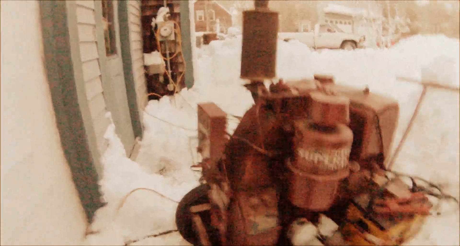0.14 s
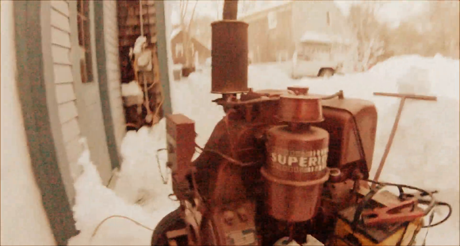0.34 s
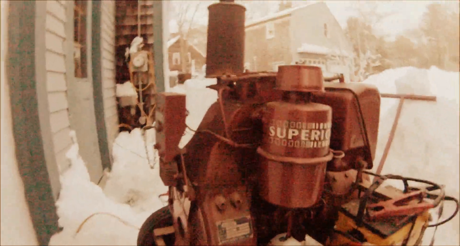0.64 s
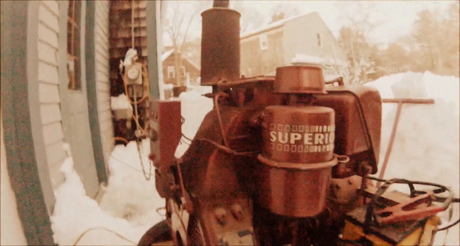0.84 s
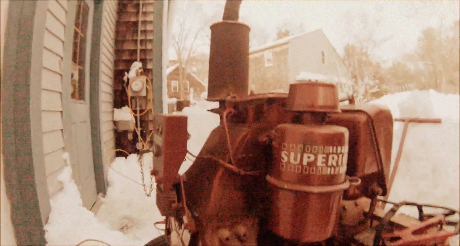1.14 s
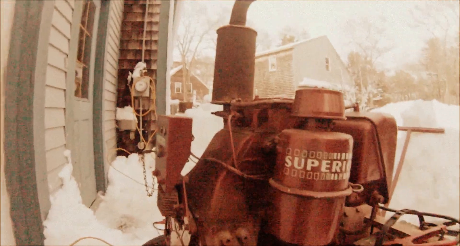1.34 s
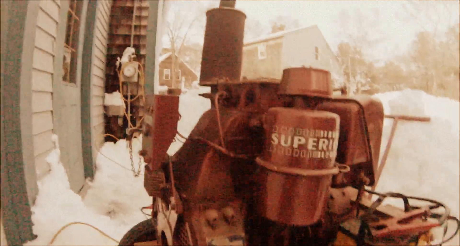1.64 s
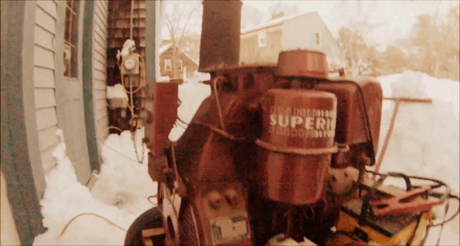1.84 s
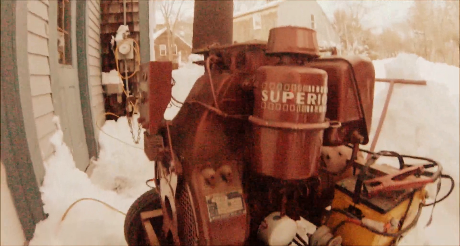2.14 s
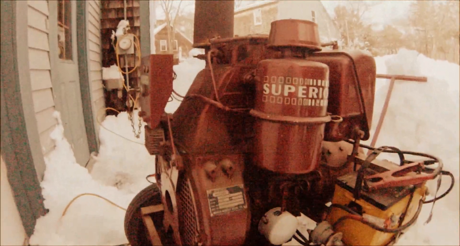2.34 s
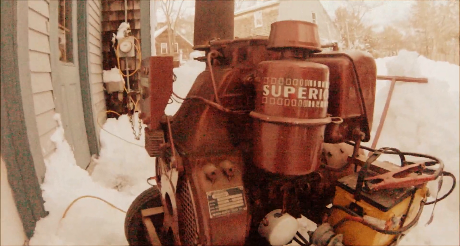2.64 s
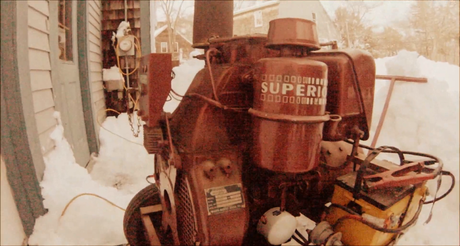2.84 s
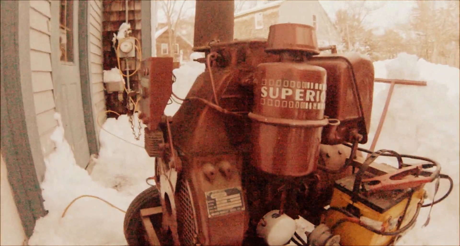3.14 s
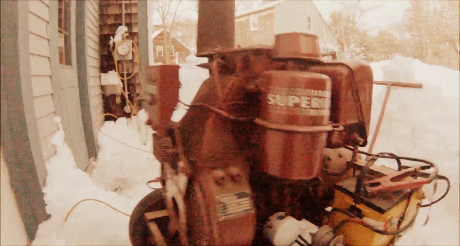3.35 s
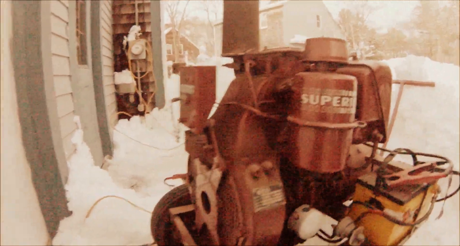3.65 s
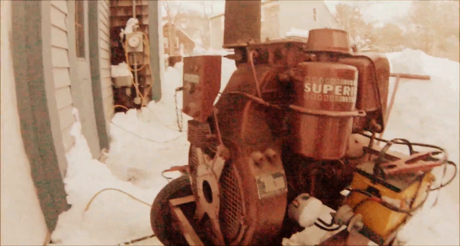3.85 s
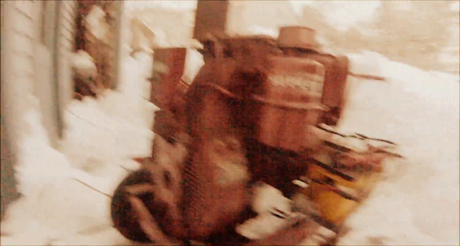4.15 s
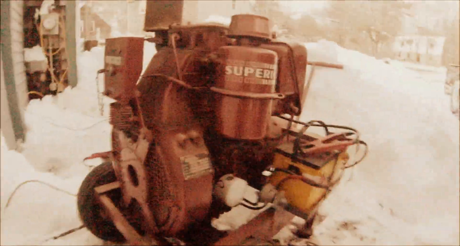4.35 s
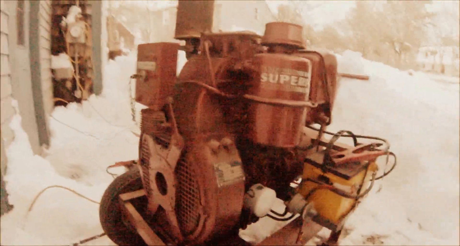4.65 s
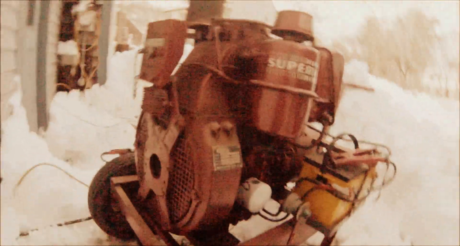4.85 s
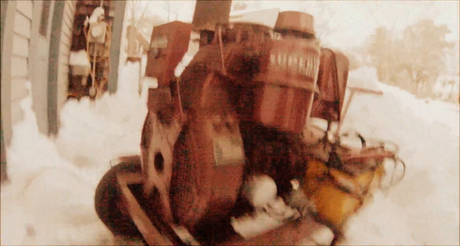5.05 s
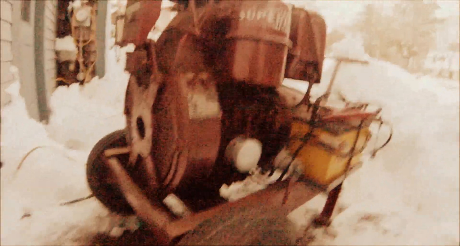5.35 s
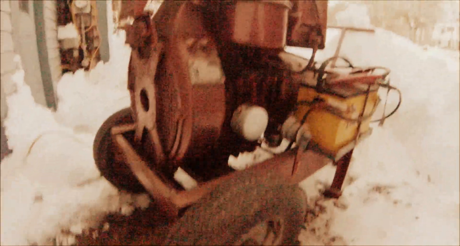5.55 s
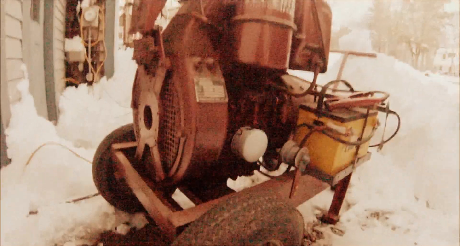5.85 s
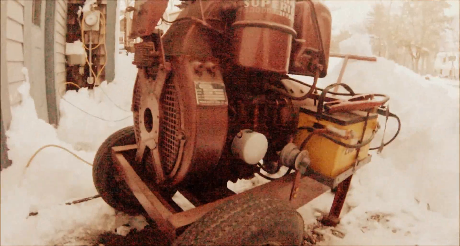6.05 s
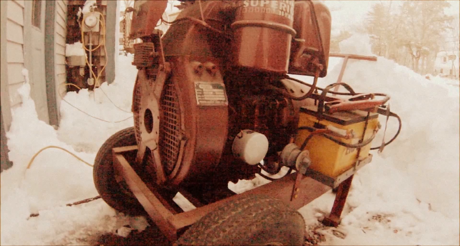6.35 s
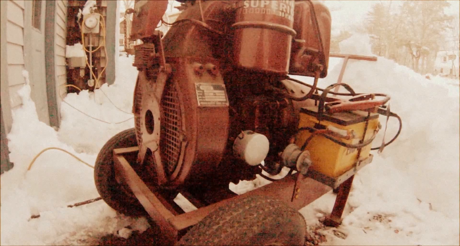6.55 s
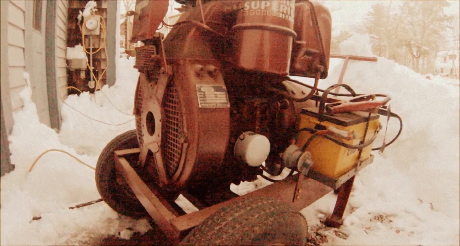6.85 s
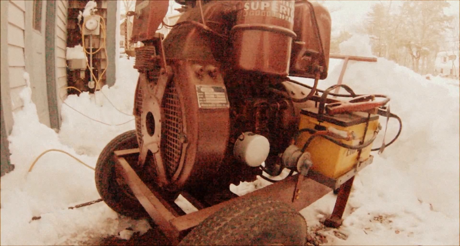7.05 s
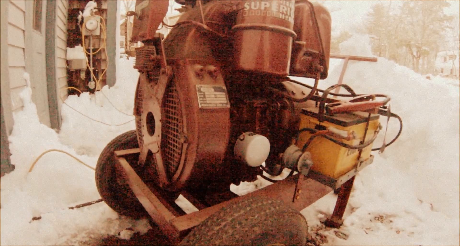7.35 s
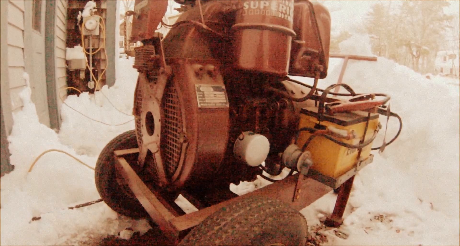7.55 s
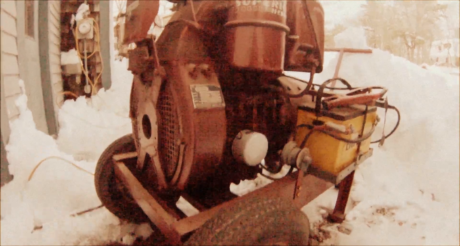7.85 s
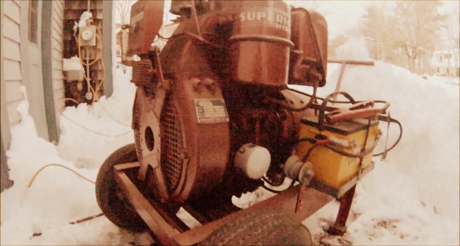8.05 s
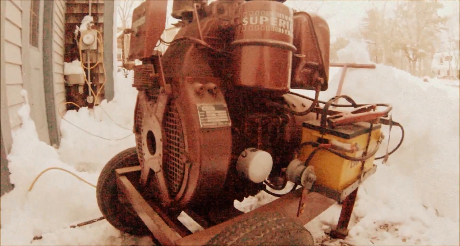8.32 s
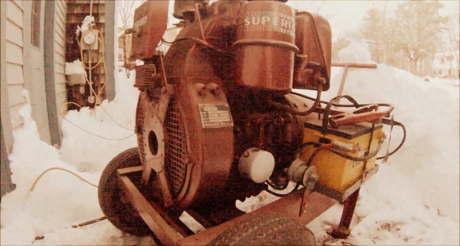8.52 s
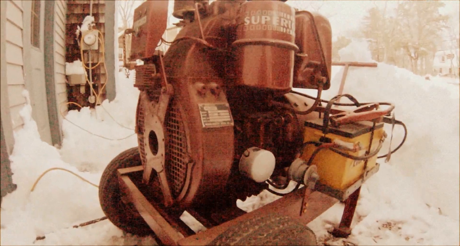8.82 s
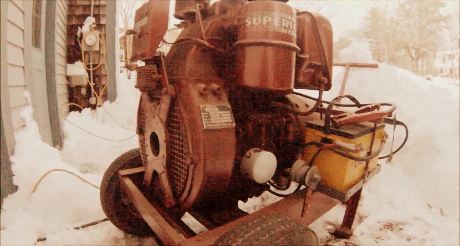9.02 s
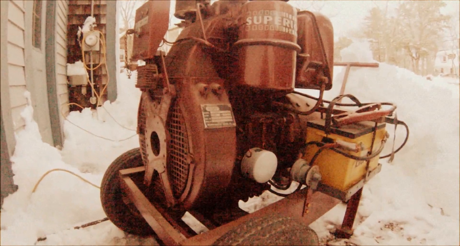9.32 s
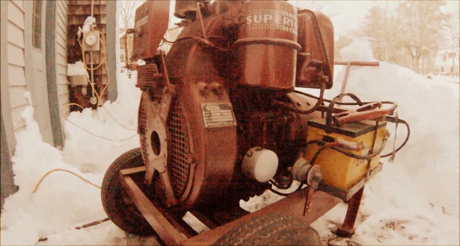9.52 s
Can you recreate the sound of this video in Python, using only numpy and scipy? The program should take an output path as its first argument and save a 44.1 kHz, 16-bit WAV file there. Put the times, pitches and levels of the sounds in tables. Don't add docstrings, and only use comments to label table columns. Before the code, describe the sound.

A diesel engine already running hammers evenly from start to finish, about fifteen beats a second, dry and close in open air. Bright clatter and breathy treble puffs ride over a low throb and steady mechanical whine. As the listener steps around, the tone shifts slightly duller and less whiny, while fingers rub, scratch and bump the plastic microphone case, ending in a loud snap; then the steady engine remains undisturbed.

```python
import sys
import numpy as np
from scipy import signal
from scipy.fft import rfft, irfft
from scipy.io import wavfile
from scipy.ndimage import uniform_filter1d

SR = 44100
rng = np.random.default_rng(int(sys.argv[2]) if len(sys.argv) > 2 else 0)


def elevation(decibels):
    levels = np.asarray(decibels, float)
    return 10 ** (levels / 20)


def persist_wave(psi):
    counts = np.round(np.clip(psi, -1, 1) * 32767).astype(np.int16)
    wavfile.write(sys.argv[1], SR, np.atleast_2d(counts).T)


N = 426888

CYCLE_HZ = 15.292
FIRING_AT = (.528, .542)
FRAME_ORDERS, FRAME_LAG = (4, 10), .08
REST_TREBLE_DB, REST_MIDDLE_DB = -3.5, -2
GUST_DB, GUST_HZ, SHELTER_DB = 4.0, 1.6, -2.5
INJECTOR_BEAM_DB, COVER_BEAM_DB = -2, 4.0
SNAP_S, SNAP_DB, SWING_DB, SWING_HZ = 5.6853, -9, -9.5, 26
PUSH_DB = -10
STROKE_RISE_S, STROKE_FALL_S, SHIFT_S = 0.036, 0.048, 0.077

# (time [s], place [0 first - 1 second], hand turn [-1 injector side - +1 valve cover])
WALK = [(0, 0.24, -0.2), (.4, 0.031, -0.5), (.9, 0, -.4), (1.4, 0.059, -1.1), (1.9, 0, -0.51),
        (2.4, 0.085, 0.44), (3.4, 0.025, 0.0033), (4.3, 0.56, .2), (4.7, 0.34, 0), (5.1, .67, .1),
        (5.4, 0.96, 0), (6, 1, 0.15), (8.5, 0.92, 0), (9.68, 0.85, 0)]
# (multiple of cycle, first place [dB rms], second place [dB rms])
EXHAUST_ORDERS = [(1, -49, -57), (2, -44, -45), (3, -46, -47), (4, -47, -49), (5, -41, -40), (6, -40, -37),
                  (7, -56, -63), (8, -62, -65), (9, -53, -54), (10, -51, -51), (11, -53, -58),
                  (12, -50, -53), (13, -56, -59), (14, -63, -63), (15, -63, -65), (16, -69, -64)]
# (multiple of cycle, first place [dB rms], second place [dB rms])
TONE_ORDERS = [(30, -57, -54), (32, -54, -58), (33, -56, -56), (34, -51, -58), (36, -53, -49),
               (38, -60, -55), (42, -58, -65), (46, -58, -57), (48, -70, -58), (68, -55, -56),
               (70, -49, -55), (72, -47, -49), (74, -54, -62), (94, -48, -48), (95, -50, -60),
               (100, -44, -53), (101, -49, -70), (102, -50, -50), (103, -60, -52), (104, -49, -57),
               (105, -48, -70), (106, -42, -46), (108, -54, -48), (109, -63, -55), (110, -55, -58),
               (114, -55, -64), (140, -54, -65), (142, -49, -47), (144, -44, -47), (146, -52, -50)]
TONE_FAMILIES = [(50, 0.0035, 0.67), (80, .42, 0.23), (120, .08, 0.5), (150, 0.0025, 0.23)]
# (centre [Hz], width [Hz], first place [dB], second place [dB])
CASING_MODES = [(369, 57, -56, -62), (465, 125, -52, -51), (707, 110, -51.5, -54), (1004, 72, -50.5, -51.5),
                (1118, 125, -47.5, -52), (1412, 148, -41, -45), (1540, 161, -36.5, -42),
                (1735, 260, -51, -47.5), (2200, 240, -45, -45), (2448, 234, -41, -43.5),
                (2706, 150, -55.5, -53), (3090, 200, -54, -48.5), (3426, 330, -45.5, -46),
                (3883, 440, -47, -52), (4850, 520, -52, -56.5), (6655, 670, -51.5, -50.5),
                (8100, 500, -91.5, -79), (10300, 890, -62.5, -66.5), (11330, 1200, -62.5, -61.5),
                (14400, 870, -70, -73)]
# (top [share of cycle], rise [share], fall [share], treble [dB], middle clatter [dB])
PUFFS = [(.005, .01, .06, 5, -0.5), (.3, 0.11, 0.097, -1, 2), (.55, .11, .14, 5, 4),
         (.757, .02, 0.18, 8.0, 3.0), (0.937, 0.0096, .05, 0, 5.5)]
# (frequency [Hz], density [dB per Hz])
AIR_SPECTRUM = [(12, -53.5), (30, -64), (80, -74), (200, -78.5), (800, -78), (2000, -80.5), (4300, -82),
                (5600, -84), (7500, -88.5), (9000, -91.5), (12500, -101), (15700, -103)]
# (time [share of cycle], first place peak [dB], second place peak [dB], favoured [Hz])
CONTACTS = [(.25, -38, -54, 6600), (.46, -53.5, -56, 14000), (.733, -41.5, -48, 11000),
            (.748, -40, -39, 14400), (.75, -55, -35, 6970), (.775, -42, -43, 10600), (.8, -54, -39.5, 6800),
            (.928, -44, -45, 14400), (.932, -39.5, -43, 9800), (.955, -45, -40.5, 10000)]
# (frequency [Hz], t60 [s], first place [dB], second place [dB])
VALVE_GEAR_PARTS = [(4850, 0.0067, -5, -7), (6600, 0.021, -7, -1), (6850, 0.013, -3, 3),
                    (8280, 0.023, -27, -10), (9480, 0.0091, -2.5, -4), (10200, .012, -1, -5.5),
                    (11250, 0.0078, 0.5, -3.5), (12600, 0.0072, -9, -6), (14400, 0.0062, -5, -3),
                    (14750, 0.0046, -9, -4)]
# (time [s], peak [dB], thump [Hz], crack re thump [dB])
KNOCKS = [(0.984, -27, 105, -16), (1.858, -27, 102, -14), (4.051, -23, 143, -19), (4.073, -17, 150, -4.5),
          (4.249, -26, 153, -2), (4.334, -35, 103, -5), (4.37, -22.5, 128, -14), (4.397, -26, 137, -10),
          (4.459, -22.5, 105, -10), (4.573, -16.5, 124, -15), (4.623, -30, 102, -18), (4.668, -26, 106, -6),
          (4.696, -24.5, 124, -2), (4.805, -23, 128, -15), (4.867, -21, 161, -22), (4.877, -17, 270, -33),
          (4.933, -24, 144, -18), (4.959, -29, 103, -15), (5.015, -18.5, 121, -15), (5.122, -28, 127, -16),
          (5.217, -22, 120, -9), (5.288, -31, 213, -9), (5.481, -33, 137, -15), (5.798, -16, 149, -21),
          (5.859, -22, 188, -25), (5.935, -24, 103, -20)]
# (frequency [Hz], level [dB], t60 [s])
CASE_MODES = [(696, -2, 0.021), (994, -12, 0.033), (1443, 3.5, 0.016), (2330, -38, 0.21)]
# (start [s], length [s], pressure [dB], slide [dB], slide speed [0 scratch - 1 rustle])
STROKES = [(0.142, 0.069, -31, -48, .15), (0.194, 0.15, -32, -46, .1), (4.06, .14, -46, -48, .6),
           (4.26, .12, -38, -48, .3), (4.42, 0.071, -33.5, -39, 0.46), (4.538, .06, -33.5, -36, 0.78),
           (4.65, .06, -37, -34, .7), (4.837, 0.075, -31, -39, .6), (4.927, .06, -35, -38, .75),
           (5.03, .15, -35.5, -38.5, 0.47), (5.23, 0.14, -37, -38, 0.74), (5.4, 0.26, -41, -52, .6),
           (5.703, 0.11, -36, -55, .4), (5.83, 0.15, -38, -47, 0.57)]
# (time [s], level [dB])
GRIP_SHIFTS = [(.14, -30.5), (.3, -35), (4.08, -34), (4.28, -29.5), (4.46, -27), (4.7, -29), (4.9, -32),
               (5.16, -34), (5.6, -38), (5.85, -36), (7.93, -42)]


def rms_one(x):
    return x / np.sqrt(np.mean(x ** 2) + 1e-20)


def in_time(rows):
    time_s, *columns = np.transpose(rows)
    return [np.interp(np.arange(N) / SR, time_s, column) for column in columns]


def between(first, second, place):
    return first + (second - first) * place


def drift(rate_hz):
    r = np.exp(-80 * np.pi * rate_hz / SR)
    slow = signal.lfilter([1], [1, -2 * r, r * r], rng.standard_normal(N // 40 + 2002))[2000:]
    return np.interp(np.arange(N) / 40, np.arange(len(slow)), rms_one(slow))


def swell(since, rise, hold, fall):
    before = np.minimum(since, 0) / rise
    after = np.maximum(since - hold, 0) / fall
    return np.exp(-before ** 2 - after ** 2)


def band(x, low_hz, high_hz):
    return signal.sosfilt(signal.butter(2, [low_hz, high_hz], "band", fs=SR, output="sos"), x)


def ring(clicks, hz, t60_s):
    r = elevation(-60 / (t60_s * SR))
    w = 2 * np.pi * hz / SR
    return signal.lfilter([0, np.sin(w)], [1, -2 * r * np.cos(w), r * r], clicks + 1e-18)


def looped(turns):
    steps = 700
    return rms_one(np.interp(turns % 1 * steps, np.arange(steps), rng.standard_normal(steps), period=steps))


def breath(cycles, hz):
    depth = np.clip(np.log2(hz / 3000) / 1.75, 0, 1.3)
    middle = max(0, 1 - depth) * min(1, hz / 1600)
    share = np.arange(400) / 400
    gain_db = depth * REST_TREBLE_DB + middle * REST_MIDDLE_DB
    for top, rise, fall, treble_db, middle_db in PUFFS:
        since = (share - top + .5) % 1 - .5
        gain_db = gain_db + (depth * treble_db + middle * middle_db) * swell(since, rise, 0, fall)
    return gain_db[(cycles % 1 * len(share)).astype(int) % len(share)]


def facing(x, injector_db, cover_db):
    injector = (elevation(injector_db) - 1) * band(x, 6400, 7500)
    cover = (elevation(cover_db) - 1) * band(x, 8800, 11900)
    return x + injector + cover


def air(cycles, place):
    hz, level_db = np.transpose(AIR_SPECTRUM)
    grid_hz = np.arange(N // 2 + 1) * SR / N + 1e-3
    density = elevation(np.interp(np.log(grid_hz), np.log(hz), level_db))
    spectrum = rfft(rng.standard_normal(N)) * density * np.sqrt(SR / 2)
    spectrum *= grid_hz > 8
    treble = np.clip((grid_hz - 3500) / 4000, 0, 1)
    bass = np.clip((300 - grid_hz) / 150, 0, 1)
    lumps = irfft(spectrum * bass, N) * elevation(GUST_DB * drift(GUST_HZ) + SHELTER_DB * place)
    steady = irfft(spectrum * (1 - treble - bass), N)
    puffing = irfft(spectrum * treble, N) * elevation(breath(cycles, 11800))
    return lumps + steady + puffing


def handling():
    t = np.arange(N) / SR
    rub = rms_one(band(rng.standard_normal(N) * elevation(1.8 * drift(30)), 70, 155))
    sway = rms_one(band(rng.standard_normal(N), 19, 47))
    slips = rng.standard_normal(N) * elevation(3.5 * drift(50))
    scratch = rms_one(band(slips, 210, 790))
    rustle = rms_one(band(slips + rng.standard_normal(N), 1100, 2900))
    powers = np.zeros((4, N))
    for start_s, length_s, press_db, slide_db, speed in STROKES:
        near = slice(max(0, int((start_s - .2) * SR)), int((start_s + length_s + .2) * SR))
        angle = np.pi / 2 * np.clip(speed, 0, 1)
        gains = np.array([[elevation(press_db)], [elevation(slide_db) * np.cos(angle)], [elevation(slide_db) * np.sin(angle)]])
        powers[:3, near] += (gains * swell(t[near] - start_s, STROKE_RISE_S, length_s, STROKE_FALL_S)) ** 2
    for time_s, shift_db in GRIP_SHIFTS:
        near = slice(max(0, int((time_s - .3) * SR)), int((time_s + .3) * SR))
        powers[3, near] += (elevation(shift_db) * swell(t[near] - time_s, SHIFT_S, 0, SHIFT_S)) ** 2
    return np.sum(np.sqrt(powers) * [rub, scratch, rustle, sway], axis=0)


def knocks():
    out, cracks = np.zeros(N), np.zeros(N)
    t = np.arange(int(.09 * SR)) / SR
    for time_s, peak_db, hz, crack_db in KNOCKS:
        i = round((time_s + 0.00495 - 1 / hz) * SR)
        turns = hz * t - 1
        thump = np.cos(2 * np.pi * turns) * np.exp(-(turns / np.where(turns < 0, .4, .8)) ** 2)
        overtone = 0.52 * np.cos(2 * np.pi * 2.1 * turns) * np.exp(-(turns / .3) ** 2)
        out[i:i + len(t)] -= elevation(peak_db + 1.0) * (thump + overtone)
        cracks[i + round(SR / hz)] = elevation(peak_db + crack_db + 7.0)
    cracks = signal.lfilter([.16], [1, -.84], cracks + 1e-18)
    i = round(SNAP_S * SR)
    cracks[i:i + 70] += elevation(SNAP_DB - 11.5) * np.diff(np.hanning(71) ** 8) * 3
    out[i:i + len(t)] -= elevation(SWING_DB) * np.sin(2 * np.pi * SWING_HZ * t) * np.exp(-(t / 0.048) ** 2)
    out += elevation(PUSH_DB) * np.exp(-((np.arange(N) / SR - SNAP_S + 0.0052) / 0.0011) ** 2)
    return out + sum(elevation(level_db) * ring(cracks, hz, t60_s) for hz, level_db, t60_s in CASE_MODES)


def valve_gear(place):
    share, first_db, second_db, favoured_hz = np.transpose(CONTACTS)
    cycle = np.arange(int(N / SR * CYCLE_HZ) + 1)[:, None]
    jitter = rng.normal(0, 0.0027, (len(cycle), len(share)))
    at = ((cycle + share + jitter) / CYCLE_HZ * SR).astype(int)
    at = np.minimum(at, N - 1)
    blow_db = between(first_db, second_db, place[at]) + rng.normal(0, 1.3, at.shape)
    out = np.zeros(N)
    for hz, t60_s, part_first_db, part_second_db in VALVE_GEAR_PARTS:
        clicks = np.zeros(N)
        detune_db = -22 * abs(np.log2(hz / favoured_hz))
        part_db = between(part_first_db, part_second_db, place[at]) + detune_db
        level_db = blow_db + part_db + rng.normal(0, 1.6, at.shape)
        clicks[at] = elevation(level_db) * rng.choice([-1, 1], at.shape)
        contact = np.hanning(31) * np.cos(2 * np.pi * hz / SR * np.arange(31)) / 7.5
        out += ring(np.convolve(clicks, contact, "same"), hz, t60_s)
    return out


def casing(cycles, place):
    repeating = [0.54 * looped(2 * cycles) + 0.47 * looped(cycles) for _ in range(2)]
    steady = np.cos(np.pi / 2 * place) * repeating[0] + np.sin(np.pi / 2 * place) * repeating[1]
    fresh = rng.standard_normal((2, N))
    out = 0
    for k, (hz, width_hz, first_db, second_db) in enumerate(CASING_MODES):
        drive = fresh[k % 2] + 0.85 * steady * min(1, 1500 / hz)
        rung = rms_one(band(drive, hz - width_hz / 2, hz + width_hz / 2))
        level_db = between(first_db, second_db, place) + 0.6 * drift(14.0) + breath(cycles, hz)
        out = out + rung * elevation(level_db)
    return out


def tones(cycles, place):
    wavers = [0.03 * drift(4.0) for _ in TONE_FAMILIES]
    swells = [elevation(1.0 * drift(2.0)) for _ in range(5)]
    highest = [row[0] for row in TONE_FAMILIES]
    out = 0
    for k, first_db, second_db in TONE_ORDERS:
        family = min(np.searchsorted(highest, k), len(TONE_FAMILIES) - 1)
        _, loudest_at, scatter = TONE_FAMILIES[family]
        angle = k * (cycles - loudest_at) + wavers[family] + scatter * (rng.random() - .5)
        level = between(elevation(first_db), elevation(second_db), place) * swells[k % 5]
        out = out + level * np.cos(2 * np.pi * angle)
    return np.sqrt(2) * out


def exhaust(cycles, place):
    since = cycles - between(*FIRING_AT, place)
    beat = 0
    for k, first_db, second_db in EXHAUST_ORDERS:
        angle = k * (since - FRAME_LAG) + .5 if k in FRAME_ORDERS else k * since + 0.44
        beat = beat + between(elevation(first_db), elevation(second_db), place) * np.cos(2 * np.pi * angle)
    return np.sqrt(2) * beat * elevation(0.16 * drift(8.2))


def scene():
    place, turn = in_time(WALK)
    place = np.clip(place, 0, 1)
    cycles = np.arange(N) / SR * CYCLE_HZ + .002 * drift(0.68)
    stepping = np.clip(uniform_filter1d(abs(np.gradient(place)) * SR, size=4410), 0, 1)
    cycles = cycles + .007 * stepping * drift(5.7)
    bright = air(cycles, place) + valve_gear(place) + casing(cycles, place) + tones(cycles, place)
    engine = facing(bright, INJECTOR_BEAM_DB * turn, COVER_BEAM_DB * turn) + exhaust(cycles, place)
    return (handling() + knocks() + engine)[None]


def low_pass(x):
    return signal.sosfilt(signal.butter(12, 15720, fs=SR, output="sos"), x)


def record(dry):
    mix = signal.sosfilt(signal.ellip(10, .5, 60, 15300, fs=SR, output="sos"), dry)
    return low_pass(mix)


dry = scene()
out = record(dry)
persist_wave(out)
```